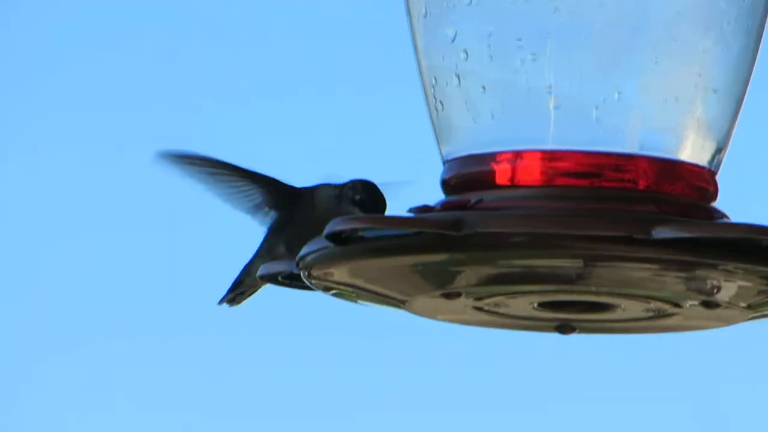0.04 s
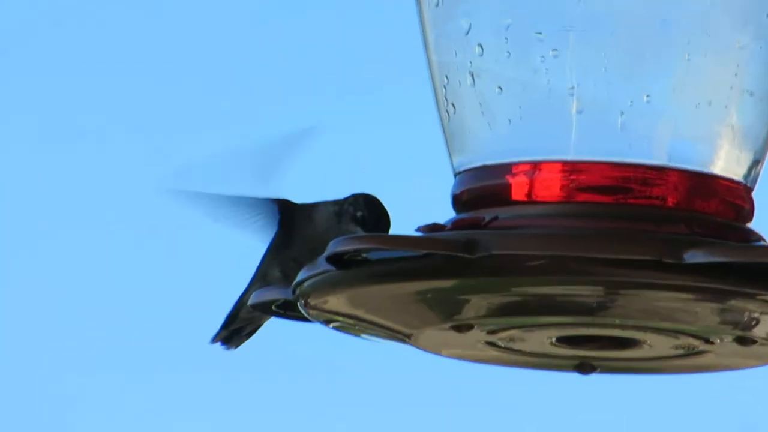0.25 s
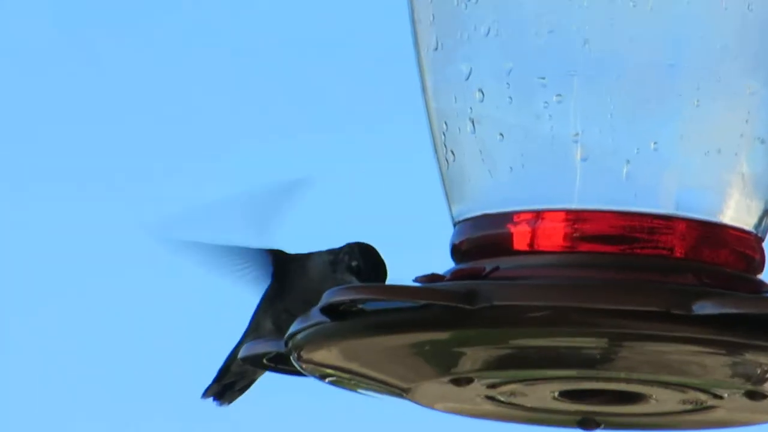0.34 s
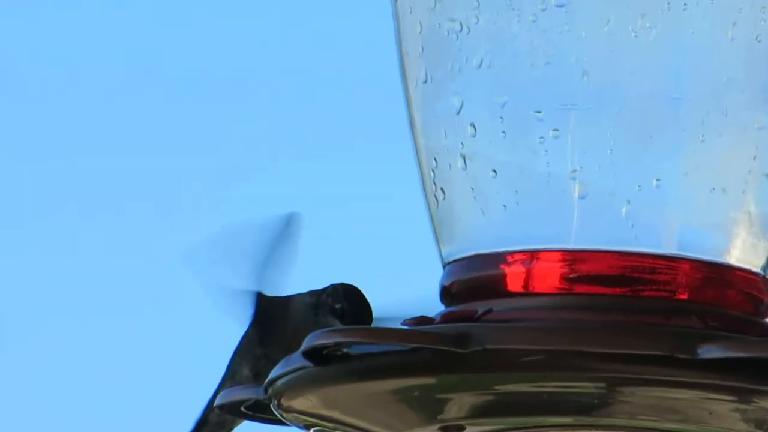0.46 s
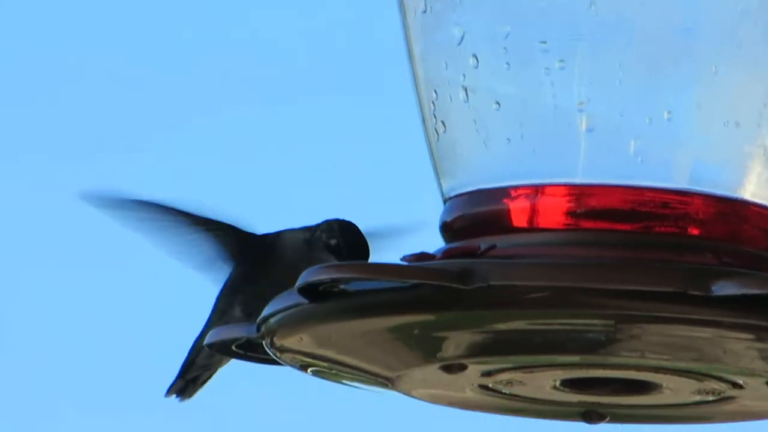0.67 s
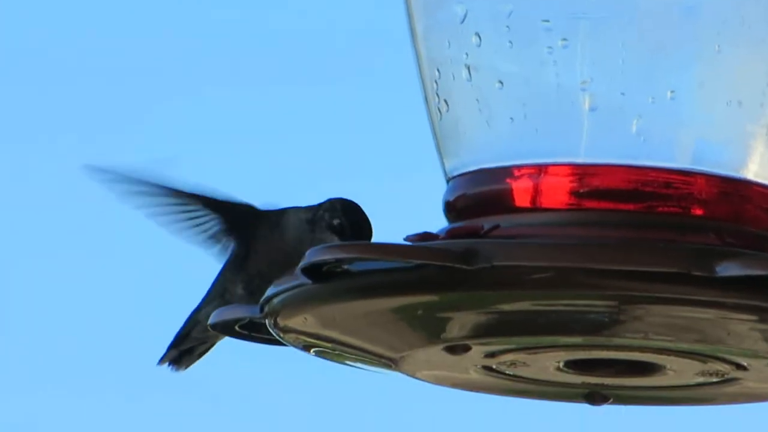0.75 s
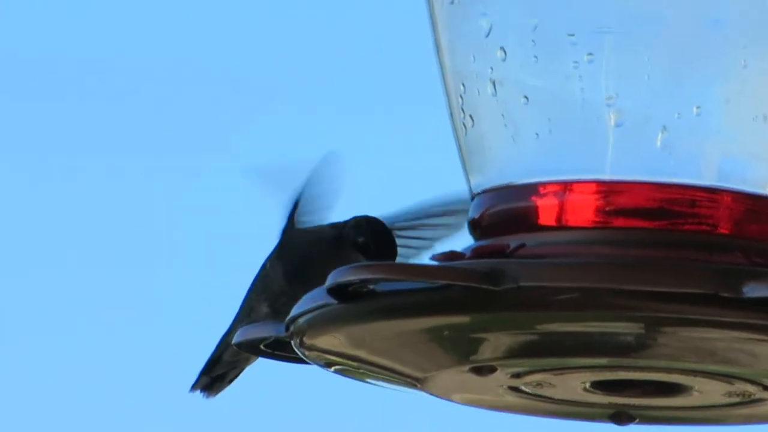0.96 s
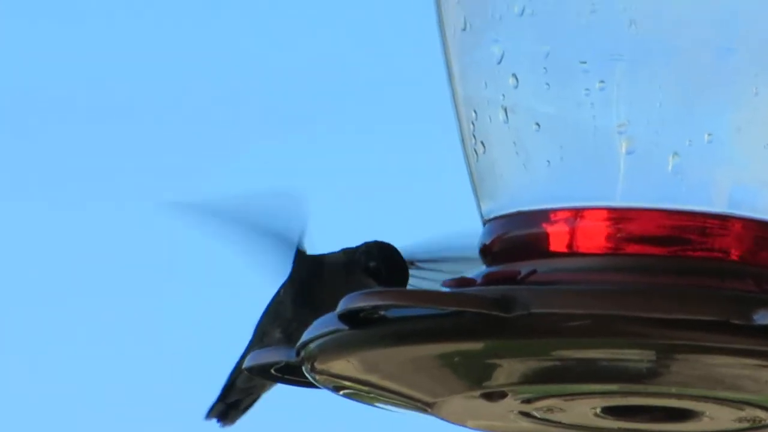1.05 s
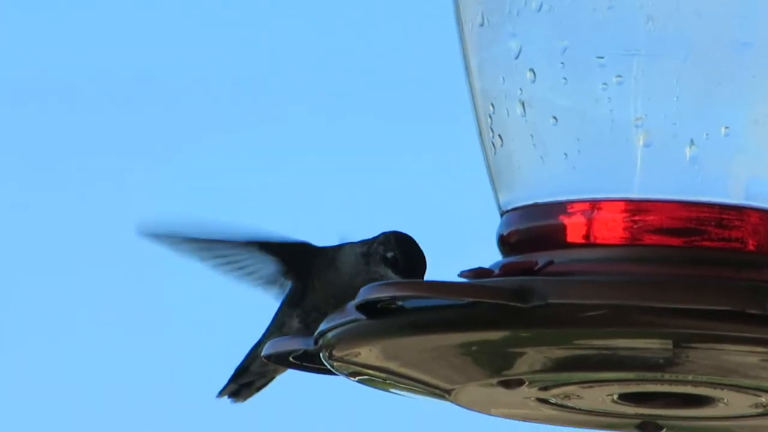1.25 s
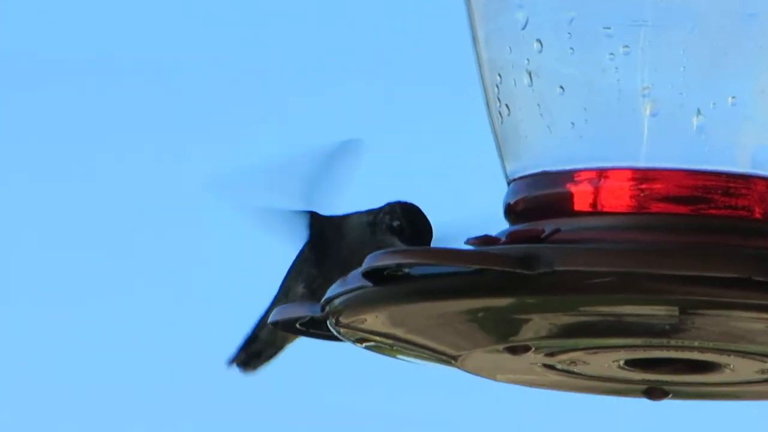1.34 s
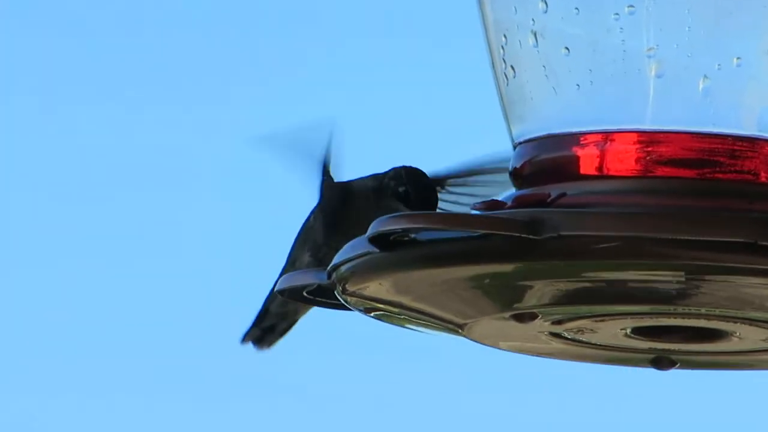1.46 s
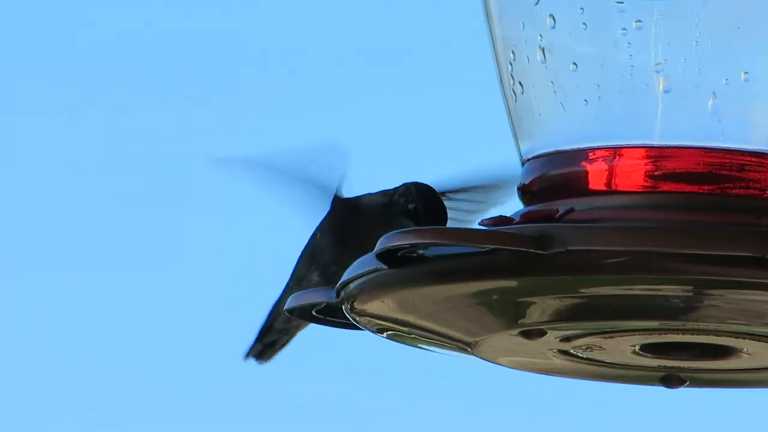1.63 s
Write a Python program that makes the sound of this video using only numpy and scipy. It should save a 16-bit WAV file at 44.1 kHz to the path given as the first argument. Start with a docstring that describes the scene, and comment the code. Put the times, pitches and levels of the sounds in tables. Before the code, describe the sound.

A sharp, loud click of camera handling strikes right at the microphone at about 0.2 seconds, briefly overloading it. Quiet, steady garden noise, present from the start, drops after the click and recovers by about 1 second. A much softer tick comes at 0.6 seconds. A hummingbird's faint low wing hum, slight hiss and very faint high chirps sit in the background until the end, around 1.6 seconds.

```python
"""A hummingbird hovers at a feeder in a quiet garden. From the start: soft wing hum, distant outdoor
noise, a far drone, faint high hiss and the thin whine of a camera's electronics. Faint high chirps
come and go. At 0.21 s a sharp click rings the hand-held camera's body and overloads it; its gain
control ducks, then slowly recovers. At 0.63 s a much softer tick follows."""
import sys
import numpy as np
from scipy import signal
from scipy.io import wavfile

SR = 44100
rng = np.random.default_rng(int(sys.argv[2]) if len(sys.argv) > 2 else 0)


def digitize_waveform(pressure):
    """Quantize a signal to 16-bit integers and store it at the path in sys.argv[1].

    Rows of a 2-D input are taken as channels; values are limited to [-1, 1].
    """
    field = np.atleast_2d(pressure).T
    bounded = np.clip(field, -1, 1)
    quanta = np.round(bounded * 32767).astype(np.int16)
    wavfile.write(sys.argv[1], SR, quanta)


N = 74970
TIME_S = np.arange(N) / SR

# Outdoor noise spectrum. Each row: frequency in Hz, relative density in dB.
AIR_SPECTRUM = [(15, -31), (25, -15.5), (86, -9.5), (243, -2), (293, -10), (404, -3.5), (637, -6.5),
                (769, -4), (1390, -5.5), (4500, -19), (5600, -21.5), (6720, -24), (8320, -26), (15000, -40)]
# Outdoor noise envelope. Each row: time in seconds, level in dB.
AIR_ENVELOPE = [(0, -42), (0.2, -41.5), (0.5, -43.5), (0.95, -45), (1.2, -44.5), (1.61, -43), (1.65, -42)]
# Outdoor noise stereo image. Each row: frequency in Hz, left-right correlation.
AIR_CORRELATION = [(40, 0.6), (100, 0.33), (250, 0.22), (600, 0.11), (1500, 0.2), (4000, 0.041),
                   (12000, 0.046)]
# Wing hum envelope. Each row: time in seconds, level in dB.
WING_ENVELOPE = [(0.02, -50.5), (.075, -52), (.16, -59), (.35, -56.5), (.5, -65), (.7, -58), (.9, -54.5),
                 (1.3, -58.5), (1.52, -67), (1.7, -60)]
# Far drone. Each row: frequency in Hz, level in dB, width in Hz.
DRONE_TONES = [(51, -63.5, 14), (122.6, -60, 9.8), (181.4, -64, 10), (238.6, -65.5, 8.8), (355, -64, 11),
               (419, -65, 8), (776, -66, 14)]
# Chirps. Each row: centre in seconds, pitch in Hz, level in dB.
CHIRP_NOTES = [(.09, 8570, -66), (.14, 8050, -67), (.465, 8730, -63.5), (.56, 7880, -63), (.76, 8745, -68),
               (.98, 8050, -66), (1.01, 8760, -71), (1.26, 8570, -64), (1.386, 7920, -63.5),
               (1.51, 8700, -68)]
# Camera body modes. Each row: frequency in Hz, left and right gains in dB, T60 in seconds.
BODY_MODES = [(1128, -22, -15.5, 0.0073), (1293, -14.8, -14.5, 0.028), (1887, -21, -12.5, 0.0077),
              (2274, -1.27, -10, 0.0096), (2864, -4, -10, 0.0086), (3870, -9, -12, 0.013),
              (4127, -6.5, -10, 0.0071), (5525, -8.5, -4, .0067), (5833, -4, -11, 0.0036),
              (6700, -25, -7, .0043), (7390, -15, -6, 0.0032), (8030, -8.5, -20.5, .0034),
              (9600, -17, -30.5, 0.0054), (12200, -18.5, -29, .0043)]
# Contacts of the click. Each row: start in seconds, strength in dB.
CLICK_CONTACTS = [(0.213019, -10.7), (0.214411, -1.8), (0.215062, 11.2), (0.216042, -.5), (0.217256, -5.5)]
# Tick modes. Each row: frequency in Hz, level in dB re TICK_DB, T60 in seconds.
TICK_MODES = [(424, -14, 0.04), (990, -13.5, 0.11), (1320, -4, 0.039), (2400, -13.5, 0.014),
              (3900, -12.5, 0.012), (10400, -21, 0.0061)]

AIR_PAN_DB, AIR_FLICKER_DB = .5, 0.05
WING_HZ, WING_WIDTH_HZ = 86.4, 6.5
HUM_PAN_DB, HUM_WAVER_DB = 3.5, 2.5  # wings and drone
HISS_HZ, HISS_WIDTH_HZ, HISS_DB = 5550, 450, -67
WHINE_HZ, WHINE_DB = 15734, -77
CHIRP_S, CHIRP_WIDTH_HZ = .085, 190
LEFT_LAG_S = 0.00012
TAIL_DB, TAIL_T60_S, TAIL_BAND_HZ = -30.5, 0.035, (1500, 7930)
TICK_S, TICK_DB, TICK_BODY_DB = .633, -27, -36.5
THRESHOLD_DB, MAX_DUCK_DB, ATTACK_S, RELEASE_DB_PER_S = -15, 16.5, 0.0039, 22
CEILING, SELF_NOISE_DB, CUTOFF_HZ = 1.28, -77, 16700


def from_db(db):
    """Decibels to gain."""
    return 10 ** (np.asarray(db) / 20)


def unit_rms(x):
    """Scale to rms 1."""
    return x / np.sqrt(np.mean(x ** 2) + 1e-20)


def at_hz(table, hz):
    """Read a table on a log-frequency axis."""
    points_hz, values = np.transpose(table)
    return np.interp(np.log(hz), np.log(points_hz), values)


def pan(left_over_right_db):
    """Left and right gains."""
    return from_db(np.array([[1], [-1]]) * left_over_right_db / 2)


def bandpass(x, edges_hz):
    """Butterworth band-pass."""
    return signal.sosfilt(signal.butter(2, edges_hz, "band", fs=SR, output="sos"), x)


def drift(rate_hz):
    """Low-passed random motion, rms 1."""
    hop, warmup = 40, 2000
    pole = np.exp(-2 * np.pi * rate_hz * hop / SR)
    white = rng.standard_normal(N // hop + warmup + 2)
    slow = signal.lfilter([1], [1, -2 * pole, pole * pole], white)[warmup:]
    return np.interp(np.arange(N) / hop, np.arange(len(slow)), unit_rms(slow))


def wavering_tone(hz, width_hz, rate_hz):
    """Sine of wandering pitch, rms 1."""
    cycles = rng.random() + np.cumsum(hz + width_hz / 2 * drift(rate_hz)) / SR
    return np.sqrt(2) * np.sin(2 * np.pi * cycles)


def outdoor_air():
    """Distant noise in third-octave bands; the channels are most alike in the bass."""
    edges_hz = 22 * 2 ** (np.arange(30) / 3)
    white = rng.standard_normal((2, 2, N))
    out = np.zeros((2, N))
    for k, (low_hz, high_hz) in enumerate(zip(edges_hz, edges_hz[1:])):
        mid, side = bandpass(white[k % 2], [low_hz, high_hz])  # adjacent bands independent
        hz = np.sqrt(low_hz * high_hz)
        correlation = at_hz(AIR_CORRELATION, hz)
        gain = from_db(at_hz(AIR_SPECTRUM, hz) + AIR_FLICKER_DB * drift(1.8))
        out += gain * (np.sqrt(1 + correlation) * mid + np.sqrt(1 - correlation) * side * [[1], [-1]])
    level_db = np.interp(TIME_S, *np.transpose(AIR_ENVELOPE))
    return unit_rms(out) * from_db(level_db) * pan(AIR_PAN_DB)


def wing_hum():
    """Beating wings: one low tone that swells and fades."""
    level_db = np.interp(TIME_S, *np.transpose(WING_ENVELOPE)) + HUM_WAVER_DB * drift(21)
    return from_db(level_db) * wavering_tone(WING_HZ, WING_WIDTH_HZ, rate_hz=5.7) * pan(HUM_PAN_DB)


def far_drone():
    """Low tones wavering in pitch and level."""
    return sum(from_db(db + HUM_WAVER_DB * drift(10)) * wavering_tone(hz, width_hz, rate_hz=9.8)
               for hz, db, width_hz in DRONE_TONES) * pan(HUM_PAN_DB)


def high_hiss():
    """Steady narrow noise band, perhaps far insects."""
    edges_hz = [HISS_HZ - HISS_WIDTH_HZ / 2, HISS_HZ + HISS_WIDTH_HZ / 2]
    return from_db(HISS_DB) * unit_rms(bandpass(rng.standard_normal((2, N)), edges_hz))


def camera_whine():
    """Steady thin tone from the electronics."""
    return from_db(WHINE_DB) * np.sqrt(2) * np.sin(2 * np.pi * WHINE_HZ * TIME_S)


def chirps():
    """Thin distant chirps, each under a half-cosine swell."""
    out = np.zeros((2, N))
    for centre_s, hz, db in CHIRP_NOTES:
        swell = np.cos(np.pi * np.clip((TIME_S - centre_s) / CHIRP_S, -.5, .5))
        tones = np.array([wavering_tone(hz, CHIRP_WIDTH_HZ, rate_hz=270) for _ in range(2)])
        out += from_db(db) * swell * tones
    return out


def struck_mode(start_s, hz, t60_s):
    """Decaying sine, initial amplitude 1."""
    age_s = np.clip(TIME_S - start_s, 0, 2 * t60_s)
    return np.sin(2 * np.pi * hz * age_s) * np.exp(-np.log(1000) * age_s / t60_s)


def body_ring(start_s):
    """One contact rings the camera body; each microphone gets its own mode gains."""
    out = np.zeros((2, N))
    for k, (hz, left_db, right_db, t60_s) in enumerate(BODY_MODES):
        left = from_db(left_db) * struck_mode(start_s + LEFT_LAG_S, hz, t60_s)
        right = from_db(right_db) * struck_mode(start_s, hz, t60_s)
        out += (-1) ** k * np.array([left, right])
    return out


def casing_tail(start_s):
    """Many weak casing modes blur into a brief bright tail."""
    fade = (TIME_S >= start_s) * np.exp(-np.log(1000) * np.abs(TIME_S - start_s) / TAIL_T60_S)
    return from_db(TAIL_DB) * fade * unit_rms(bandpass(rng.standard_normal((2, N)), TAIL_BAND_HZ))


def sharp_click():
    """Five quick contacts on the camera."""
    return sum(from_db(db) * (body_ring(start_s) + casing_tail(start_s))
               for start_s, db in CLICK_CONTACTS)


def soft_tick():
    """One light contact: its own modes plus a weak body ring."""
    ring = sum(from_db(TICK_DB + db) * struck_mode(TICK_S, hz, t60_s) for hz, db, t60_s in TICK_MODES)
    return ring + from_db(TICK_BODY_DB) * body_ring(TICK_S)


def scene():
    """Garden, bird and camera, in stereo."""
    bed = outdoor_air() + wing_hum() + far_drone() + high_hiss() + camera_whine()
    return bed + chirps() + sharp_click() + soft_tick()


def record(dry):
    """Gain control ducks on peaks and recovers; then overload, self-noise, low-pass."""
    peak_db = 20 * np.log10(np.abs(dry).max(axis=0) + 1e-9)
    over_db = np.clip(peak_db - THRESHOLD_DB, 0, MAX_DUCK_DB)
    release_db = RELEASE_DB_PER_S * TIME_S
    held_db = np.maximum.accumulate(over_db + release_db) - release_db
    pole = np.exp(-1 / (ATTACK_S * SR))
    ducked = dry * from_db(-signal.lfilter([1 - pole], [1, -pole], held_db))
    clipped = np.clip(CEILING * np.tanh(ducked / CEILING), -1, 1)
    self_noise = from_db(SELF_NOISE_DB) * rng.standard_normal((2, N))
    lowpass = signal.cheby2(14, 65, CUTOFF_HZ, fs=SR, output="sos")
    return signal.sosfilt(lowpass, clipped + self_noise)


dry = scene()
out = record(dry)
digitize_waveform(out)
```